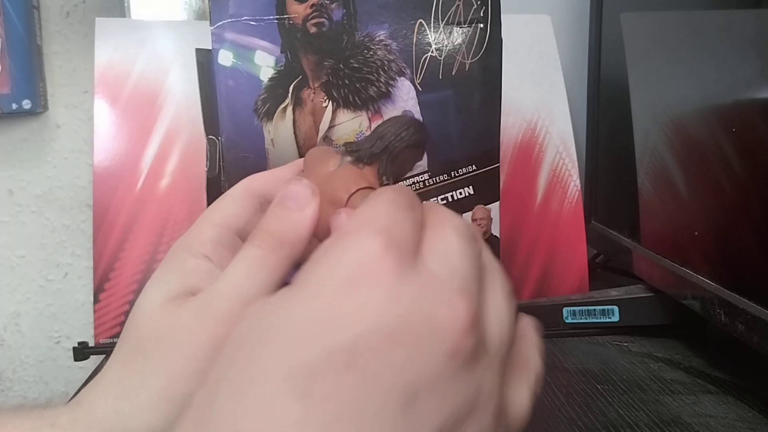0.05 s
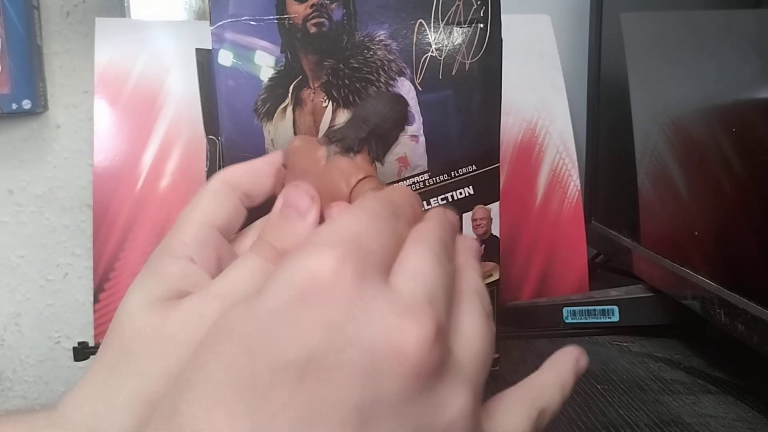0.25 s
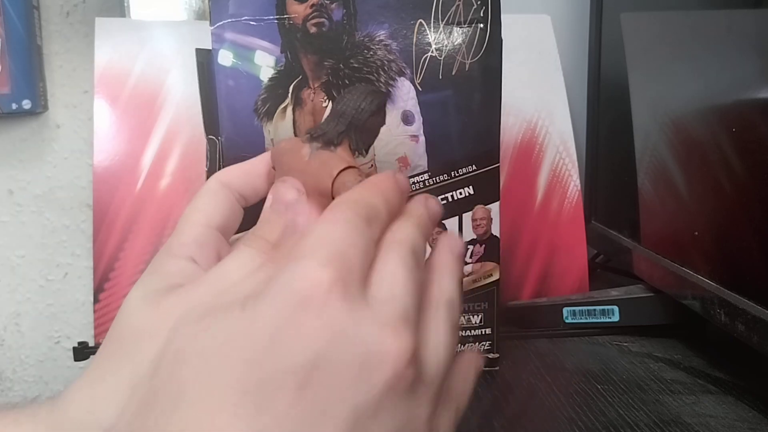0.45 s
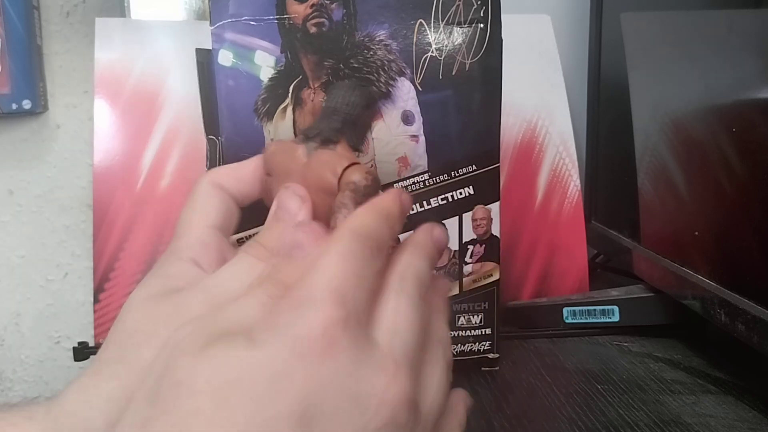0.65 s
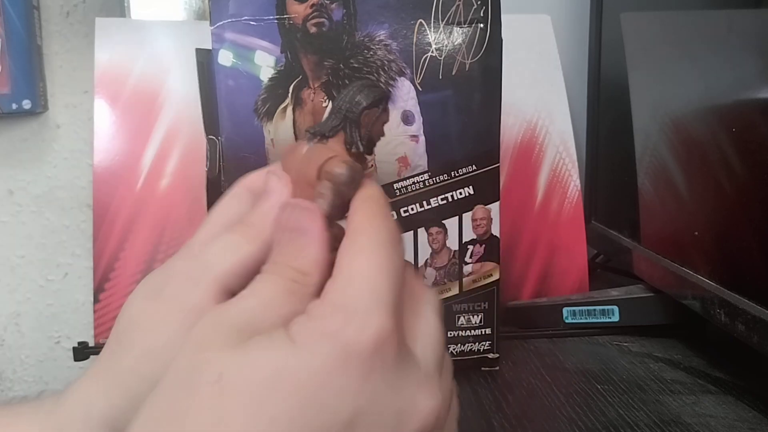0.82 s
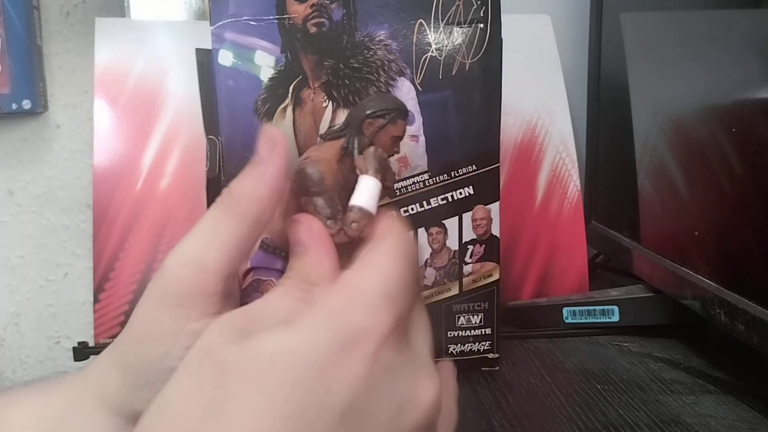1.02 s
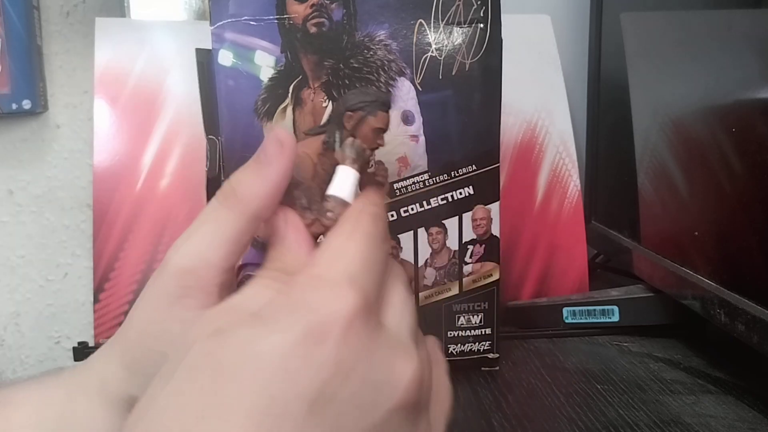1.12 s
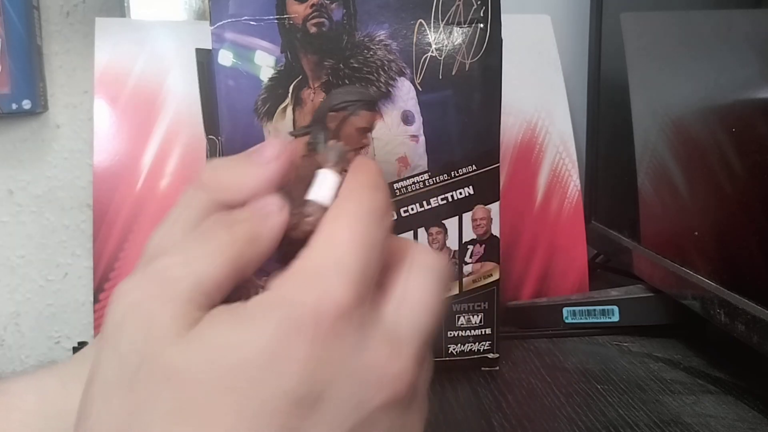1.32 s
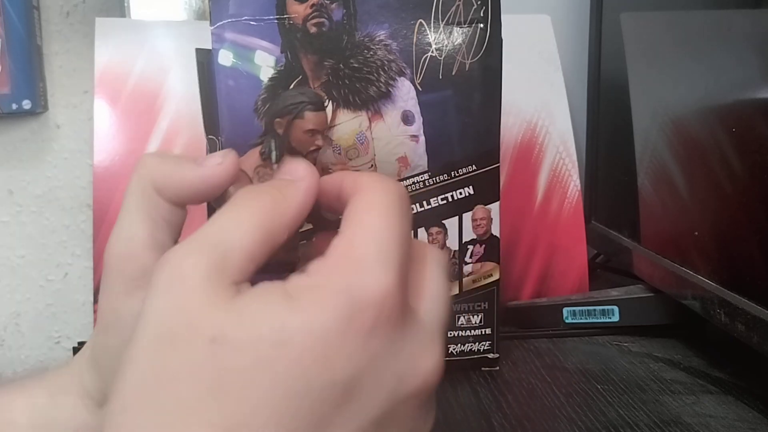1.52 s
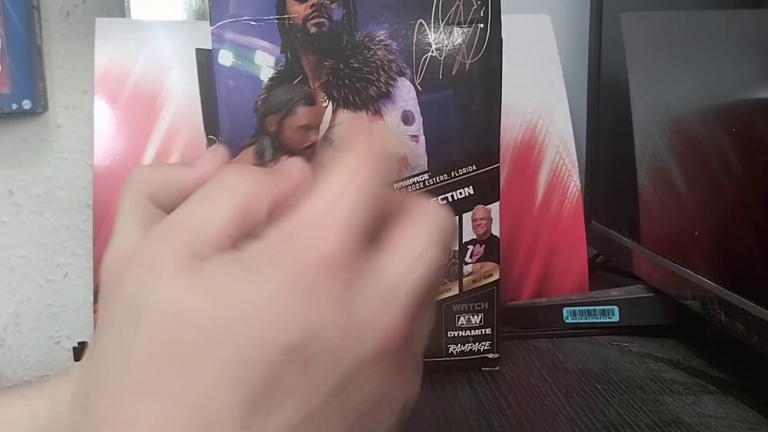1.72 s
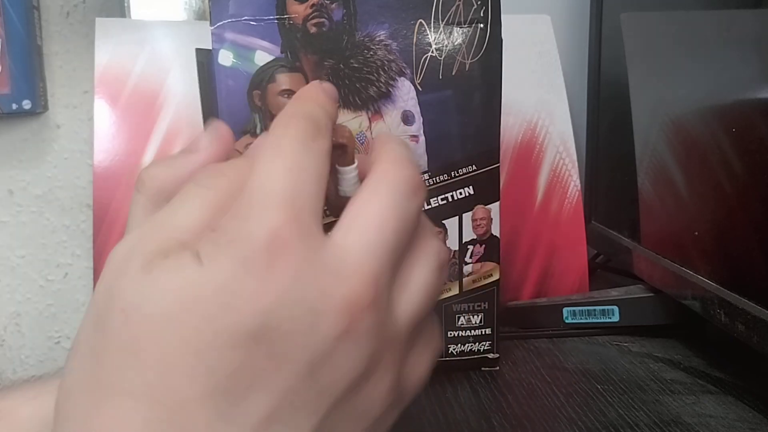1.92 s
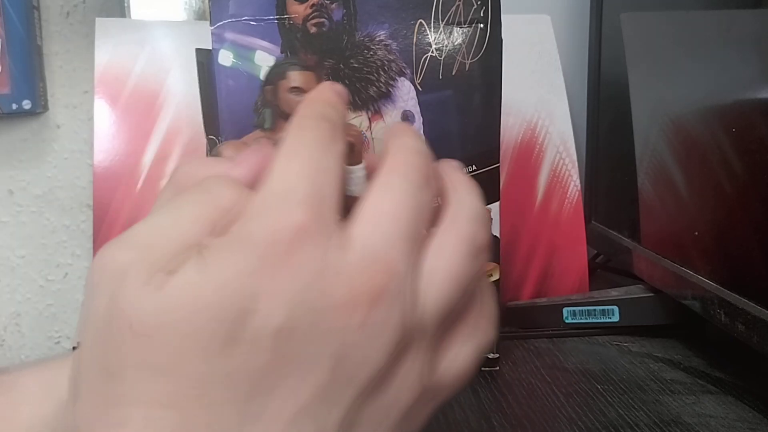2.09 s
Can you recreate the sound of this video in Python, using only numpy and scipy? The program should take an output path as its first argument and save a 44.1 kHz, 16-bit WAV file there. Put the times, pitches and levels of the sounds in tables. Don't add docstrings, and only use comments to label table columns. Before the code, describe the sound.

Plastic ratchet clicks from a toy figure's joints, sharpest near the start, with dull desk thumps and light finger scuffs; later clicks are sparser and softer. Close stereo microphone in a quiet furnished room, faint hiss.

```python
import sys
import numpy as np
from scipy import signal
from scipy.io import wavfile

SR = 44100
rng = np.random.default_rng(int(sys.argv[2]) if len(sys.argv) > 2 else 0)


def invert_db(level):
    return 10 ** (np.asarray(level, dtype=float) / 20)


def store_wav(level_fs):
    pcm = np.round(np.clip(np.atleast_2d(level_fs), -1, 1) * 32767)
    wavfile.write(sys.argv[1], SR, pcm.T.astype(np.int16))


N = 94815
OPPOSITE = np.array([[1], [-1]])


def rms_one(x):
    return x / np.sqrt(np.mean(x ** 2) + 1e-20)


def at_hz(points, hz):
    table_hz, value = np.array(points).T
    return np.interp(np.log(hz), np.log(table_hz), value)


def in_time(rows):
    s, db = np.transpose(rows)
    return np.interp(np.arange(N) / SR, s, db, left=-120, right=-120)


def drift(rate):
    r = np.exp(-80 * np.pi * rate / SR)
    white = rng.standard_normal(N // 40 + 2002)
    slow = signal.lfilter([1], [1, -2 * r, r * r], white)[2000:]
    return np.interp(np.arange(N) / 40, np.arange(len(slow)), rms_one(slow))


def ring(drive, hz, t60):
    r, w = invert_db(-60 / (t60 * SR)), 2 * np.pi * hz / SR
    return signal.lfilter([0, np.sin(w)], [1, -2 * r * np.cos(w), r * r], drive + 1e-18)


def resonate(x, hz, width_hz):
    return signal.lfilter(*signal.iirpeak(hz, hz / width_hz, fs=SR), x)


def band_pass(x, order, edges_hz):
    return signal.sosfilt(signal.butter(order, edges_hz, "band", fs=SR, output="sos"), x)


def add(out, s, piece):
    i = int(s * SR)
    out[..., i:i + piece.shape[-1]] += piece[..., :out.shape[-1] - i]


# (pitch [Hz], likeness [1 = same])
LIKENESS = [(60, 0.73), (300, 0.9), (600, 0.23), (2000, 0.043), (8000, 0.5), (14000, 0.41)]


def banded_noise(spectrum, patchy_db, rate):
    out, together = 0, drift(rate)
    edges = 30 * 2 ** np.arange(0, 9.6, .5)
    white = rng.standard_normal((2, 2, N))
    for k, (low, high) in enumerate(zip(edges, edges[1:])):
        mid, side = band_pass(white[k % 2], 2, [low, high])
        hz = np.sqrt(low * high)
        alike = np.clip(at_hz(LIKENESS, hz), -1, 1)
        gain = invert_db(at_hz(spectrum, hz) + patchy_db * (together + drift(rate)))
        out = out + gain * (np.sqrt(1 + alike) * mid + np.sqrt(1 - alike) * side * OPPOSITE)
    return rms_one(out)


# (pitch [Hz], level [dB per Hz])
HISS_COLOUR = [(290, -47), (500, -1), (775, -34), (1310, -35.5), (3500, -13), (6100, -28.5), (6560, -19.5),
               (13200, -18.5), (16500, -24)]


def hiss():
    colour = [(250, -30), *HISS_COLOUR, (18000, -77.0)]
    return invert_db(-76) * banded_noise(colour, patchy_db=0.43, rate=19)


# (time [s], level [dB])
GRIP = [(0, -53), (.12, -60), (.33, -45.5), (.39, -61.5), (.52, -54.5), (.66, -46.5), (.85, -58),
        (1.0, -56.5), (1.2, -54.5), (1.27, -62), (1.58, -62), (1.74, -57.5), (1.88, -51.5), (1.95, -59.5),
        (2.15, -60)]
# (pitch [Hz], level [dB per Hz])
RUMBLE_COLOUR = [(18, -36), (30, -23.5), (65, 4), (159, -32.5), (225, 3.5), (338, -27), (439, -12.5),
                 (544, -23.5), (800, -21.5), (1500, -65)]


def rumble():
    return invert_db(in_time(GRIP)) * banded_noise(RUMBLE_COLOUR, patchy_db=4.0, rate=19)


# (time [s], pitch [Hz], level [dB])
CREAK = [
    (1.172, 444, -82),
    (1.22, 450, -72.5),
    (1.267, 481, -75.5),
    (1.329, 442.5, -65.5),
    (1.379, 420.3, -77),
    (1.411, 402, -80),
    (1.433, 400, -51.5),
    (1.455, 394, -64.5),
    (1.499, 373, -59),
]


def creak():
    s, hz, db = np.transpose(CREAK)
    pitch = np.interp(np.arange(N) / SR, s, hz) * (1 + 0.0129 * drift(30))
    level = invert_db(in_time(np.transpose([s, db])) + 1.0 * drift(27))
    return np.sqrt(2) * level * np.sin(2 * np.pi * np.cumsum(pitch) / SR)


# (time [s], level [dB])
SHIFT = [(0, -64), (.15, -67.5), (.4, -73.5), (.57, -71), (.62, -54), (.72, -67.5), (1.05, -73),
         (1.25, -79.5), (1.7, -74.5), (1.85, -63), (1.95, -67), (2.05, -70.5), (2.15, -72)]
# (pitch [Hz], level [dB per Hz])
SHIFT_COLOUR = [(400, -26), (900, 2), (1500, -3), (2100, -9.5), (3500, -26.5)]


def skin_shift():
    level = invert_db(in_time(SHIFT) + 1.27 * drift(60))
    return level * banded_noise(SHIFT_COLOUR, patchy_db=0.0, rate=17)


# (time [s], level [dB])
RUB = [
    (1.72, -70),
    (1.77, -56.5),
    (1.81, -74),
    (1.83, -53.5),
    (1.88, -64.5),
    (1.96, -78.5),
]
# (pitch [Hz], level [dB per Hz])
RUB_COLOUR = [(470, -20), (800, 1), (2160, -2), (3570, 2), (3840, 1), (6740, -2), (14000, -54)]


def finger_rub():
    level = invert_db(in_time(RUB) + 1.0 * drift(97.8))
    return level * banded_noise(RUB_COLOUR, patchy_db=0.0, rate=13)


# (time [s], peak level [dB], pitch [Hz], length [ms])
THUMPS = [(0.027, -48.5, 98, 56), (0.064, -51, 126, 65), (0.166, -43, 83.5, 28), (0.238, -24, 81.3, 32.5),
          (0.281, -39, 92.6, 22), (0.316, -29.5, 93, 32), (0.453, -31.5, 116, 45),
          (0.575, -20.5, 110.2, 17), (0.603, -36.5, 115, 64), (0.641, -50, 86, 33),
          (0.757, -40.5, 120.4, 56), (0.931, -53, 73.6, 30), (1.15, -44.5, 80.4, 47),
          (1.198, -47, 79.5, 23), (1.481, -32.5, 74.3, 41.6), (1.624, -32.5, 81.7, 33),
          (1.657, -38, 92.4, 32.5), (1.719, -47, 101, 91), (1.754, -38, 93.6, 47), (1.823, -44, 126.4, 53),
          (1.859, -63, 78.4, 35)]
THUMP_RISE, THUMP_TAIL_DB, THUMP_T60_S = 0.29, -15.5, 0.3


def thumps():
    out, t = np.zeros(N), np.arange(12000) / SR
    bend = np.log(.5) / np.log(THUMP_RISE)
    for s, db, hz, ms in THUMPS:
        part = np.clip(t * 1000 / ms, 0, 1)
        swell = np.sin(np.pi * part ** bend) ** 2
        tail = invert_db(THUMP_TAIL_DB - 60 * t / THUMP_T60_S) * part ** 2
        add(out, s, invert_db(db) * (swell + tail) * np.sin(2 * np.pi * hz * t))
    return out


# (time [s], peak level [dB], strongest pitch [Hz], brightness [dB])
KNOCKS = [(0.029, -34.5, 230, -37), (0.066, -33, 239, -15), (0.167, -42.5, 232, -17),
          (0.232, -24.5, 248, -10), (0.316, -30, 241, -11.5), (0.462, -29.5, 244, -1),
          (0.579, -22, 250.5, -9.5), (0.604, -20.5, 285, -5.5), (0.739, -36, 243, -12),
          (0.794, -36, 243, 3), (0.875, -34, 255, -11), (0.924, -51.5, 432, 1.5), (1.02, -41, 294, -8.5),
          (1.114, -51, 223, -1), (1.152, -48, 256, 5.5), (1.478, -43.5, 245, -7), (1.533, -53, 200, -8.5),
          (1.618, -51.5, 233, -18.5), (1.754, -35.5, 248, 1), (1.809, -42.5, 246, -10),
          (1.821, -45.5, 250, -1), (1.831, -40.5, 245, -3), (1.847, -51.5, 300, 0),
          (2.082, -42, 229.6, -12.5)]
# (pitch [Hz], level [dB], time to die by 60 dB [s])
DESK = [(243, -18, 0.012), (300.3, -7.5, 0.061), (361.4, -4.5, 0.044), (429.7, -11, 0.092),
        (488, -9.5, 0.036), (574, -13, 0.042)]
CONTACT_HZ = 450
KNOCK_T60_S, KNOCK_RISE_S = 0.045, 0.013
DESK_DB, SCATTER_DB, DESK_SIDE_HZ = 12, 4.5, 720


def knocks():
    out, t = np.zeros((2, N)), np.arange(8192) / SR
    push = t * np.exp(-2 * np.pi * CONTACT_HZ * t)
    push = push / push.sum()
    for s, db, main_hz, bright_db in KNOCKS:
        main = ring(push, main_hz, KNOCK_T60_S) * (1 - np.exp(-t / KNOCK_RISE_S))
        piece = main * np.ones((2, 1))
        for hz, mode_db, t60 in DESK:
            side = OPPOSITE * (hz / DESK_SIDE_HZ) ** 3 * rng.uniform(.3, .9)
            level = invert_db(mode_db + bright_db + SCATTER_DB * rng.standard_normal())
            rise = 1 - np.exp(-t * hz * 1.6)
            piece = piece + level * ring(push, hz, t60) * (1 + side) * rise
        add(out, s, invert_db(db + DESK_DB) * piece)
    return out


def room(x):
    t = np.arange(SR // 2) / SR
    white = rng.standard_normal((2, len(t))) * invert_db(-60 * t / 0.14)
    reply = band_pass(white, 2, (350, 1100)) / np.sqrt(SR / 100)
    return signal.fftconvolve(x[None], reply, axes=1)[:, :N]


# (time [s], length [ms], peak level [dB], pitch [Hz], resonance width [Hz])
SCUFFS = [(0.03, 16, -75, 2450, 2430), (0.033, 9.7, -47, 1430, 497), (0.227, 7.5, -40, 2460, 300),
          (.233, 8.5, -37, 880, 397), (0.313, 20, -46.5, 2340, 1820), (0.319, 4.6, -49, 6400, 2000),
          (.462, 6.6, -47, 2320, 1480), (0.487, 34, -55.5, 2460, 2920), (0.491, 6, -52, 1610, 300),
          (.581, 8.6, -36, 1080, 610), (0.605, 17, -37, 1200, 700), (0.61, 15, -40.5, 786, 300),
          (.705, 7.4, -67, 2630, 400), (0.736, 21, -48, 1220, 497), (0.739, 23, -53, 2770, 704),
          (.741, 6.4, -49, 6430, 1200), (.77, 10, -52.5, 1080, 286), (0.793, 8.2, -33, 770, 400),
          (1.018, 63, -58, 940, 497), (1.152, 4.2, -48.5, 794, 393), (1.388, 6, -68, 5140, 806),
          (1.387, 3.8, -66, 2700, 898), (1.467, 13, -55.5, 856, 390), (1.477, 21.4, -53, 1574, 1500),
          (1.479, 18, -56, 6000, 6000), (1.534, 5.2, -62, 5360, 400), (1.625, 8.9, -54.5, 805, 299),
          (1.74, 6.4, -61, 3000, 4000), (1.808, 4.8, -44.5, 1170, 490), (1.811, 2.6, -41.5, 6740, 2500),
          (1.827, 11, -51, 3640, 505), (1.827, 12, -49, 6900, 2000), (1.83, 3.5, -53, 1500, 1500),
          (1.853, 4.9, -62, 3640, 500), (1.942, 11, -68, 1360, 295), (2.139, 4.2, -48, 1580, 400)]
SLIPS_PER_S, SCUFF_SIDE_DB = 2900, -3


def scuffs():
    out, t = np.zeros((2, N)), np.arange(3000) / SR
    for s, ms, db, hz, width_hz in SCUFFS:
        size, chance = rng.standard_normal((2, len(t))), rng.random(len(t))
        slips = (chance < SLIPS_PER_S / SR) | (t == 0)
        part = np.clip((t * 1000 + .3) / (1.4 * ms + 1), 0, 1)
        swell = np.sin(np.pi * part ** .5).clip(0)
        stereo = size[0] + invert_db(SCUFF_SIDE_DB) * size[1] * OPPOSITE
        drive = stereo * (slips + 0.047) * swell
        piece = resonate(resonate(drive, hz, width_hz), hz, width_hz * 2)
        add(out, s, invert_db(db) * piece / np.abs(piece.mean(axis=0)).max())
    return out


# (time [s], limb peak level [dB], limb pitch [Hz], crack level [dB], crack pitch [Hz])
SNAPS = [(.031,-45.5,2500,-93,5600), (0.066,-49,1360,-95,5800), (0.165,-29,1540,-38,7300),
         (0.2329,-20,3160,-21,6270), (0.3141,-34,4020,-82.5,6400), (0.461,-34.5,2350,-77,5230),
         (0.5778,-32.5,3430,-37.5,8650), (0.5814,-39,1190,-31,7600), (.603,-28.5,2900,-28.5,9750),
         (0.795,-33,3220,-37.5,5360), (0.926,-54.5,1240,-76.5,5800), (.943,-47.5,1236,-68,5200),
         (1.114,-49.5,2690,-75.5,5640), (1.1523,-57,1187,-80,5860), (1.484,-52,1536,-78.5,5400),
         (1.727,-58.5,1840,-58.5,6660), (1.7548,-28,1380,-36.5,6800), (1.9696,-38,1710,-58,5200)]
# (pitch [Hz], level under the snap [dB])
FIGURE = [(2530, -17), (3350, -5), (4150, -14.5), (5550, -16), (6430, -10), (7150, -11.5)]
# (band low [Hz], band high [Hz], resonance width [Hz], resonance level [dB],
# tail level [dB], tail time to die by 60 dB [s])
LIMB_BAND = (631, 4988, 401.5, 19, -4.5, 0.1229)
# (low [Hz], high [Hz], width [Hz], resonance [dB], tail [dB], tail time [s])
CRACK_BAND = (4194.5, 14496, 983, 16.5, -16.5, 0.1772)
FIGURE_T60_S, FIGURE_SCATTER_DB = 0.011, 3.5
LIMB_DB, JOINT_DB, SPREAD_DB, RIGHT_DB = -4, 10, -3, -2
BURST_S, TAIL_RING, TAIL_CUT_HZ = 0.0012, 0.17, 5500
CRISP_DB, LONGER_PER_DB, DULLER_PER_DB = -45, .03, .012


def snaps():
    out, t = np.zeros((2, N)), np.arange(10000) / SR
    for s, limb_db, limb_hz, crack_db, crack_hz in SNAPS:
        weak = np.clip(CRISP_DB - crack_db, 0, 20)
        length = BURST_S * (0.5 + LONGER_PER_DB * weak)
        limb_level, crack_level = limb_db + LIMB_DB, crack_db + JOINT_DB

        slips = rng.standard_normal((4, len(t)))
        uneven = np.sqrt(rng.exponential(1, len(t)))
        grain = uneven * np.sqrt(t / length) * np.exp(-t / length)
        drive = (slips[0] + invert_db(SPREAD_DB) * slips[1] * OPPOSITE) * grain
        dull = signal.lfilter(*signal.butter(1, TAIL_CUT_HZ, fs=SR), slips[2:])
        tail = dull * (1 - np.exp(-t / length))

        for hz, db in FIGURE:
            body = ring(drive, hz, FIGURE_T60_S)
            snap_db = limb_level if hz < CRACK_BAND[0] else crack_level
            body_db = snap_db + db - weak + FIGURE_SCATTER_DB * rng.standard_normal()
            add(out, s, invert_db(body_db) * body / np.abs(body).max())

        for db, hz, band in ((limb_level, limb_hz, LIMB_BAND), (crack_level, crack_hz, CRACK_BAND)):
            low_hz, high_hz, width_hz, peak_db, tail_db, t60 = band
            edges = [low_hz, high_hz * np.exp(-DULLER_PER_DB * weak)]
            both = band_pass([drive, tail * invert_db(-60 * t / t60)], 3, edges)
            share = np.reshape([1, TAIL_RING], (2, 1, 1))
            both = both + invert_db(peak_db) * resonate(both, hz, width_hz) * share
            burst = both[0] / np.abs(both[0].mean(axis=0)).max()
            after = both[1] / np.abs(both[1]).max()
            add(out, s, invert_db(db) * (burst + invert_db(tail_db) * after))
    return out * invert_db(np.array([[0], [RIGHT_DB]]))


def scene():
    knock = knocks()
    hands = rumble() + creak() + skin_shift() + finger_rub()
    desk = thumps() + knock + invert_db(-13) * room(knock[0])
    return hiss() + hands + desk + scuffs() + snaps()


def roll_off(x):
    return signal.sosfilt(signal.butter(12, 16820, fs=SR, output="sos"), x)


def record(dry):
    low_cut = signal.sosfilt(signal.butter(4, 52, "high", fs=SR, output="sos"), dry)
    mix = signal.sosfilt(signal.cheby2(10, 60, 17050, fs=SR, output="sos"), low_cut)
    return roll_off(mix)


dry = scene()
out = record(dry)
store_wav(out)
```